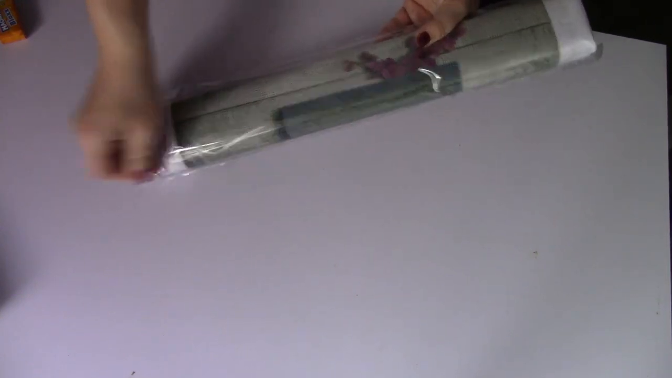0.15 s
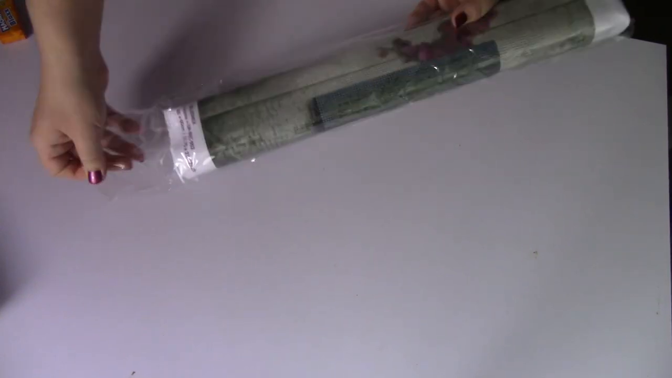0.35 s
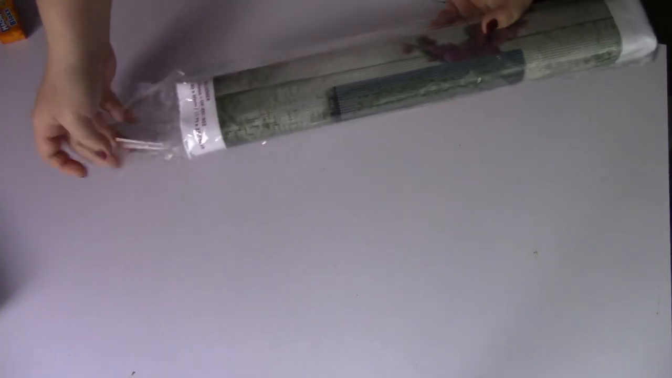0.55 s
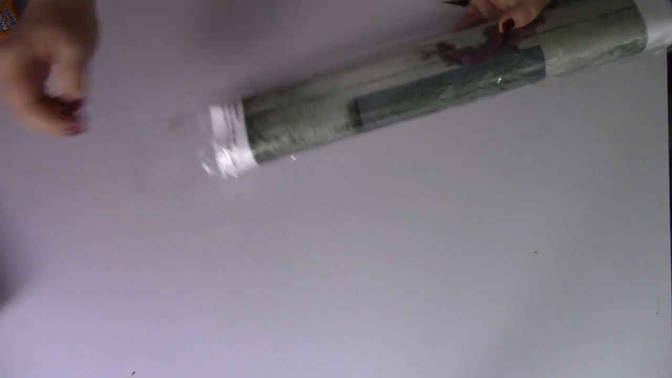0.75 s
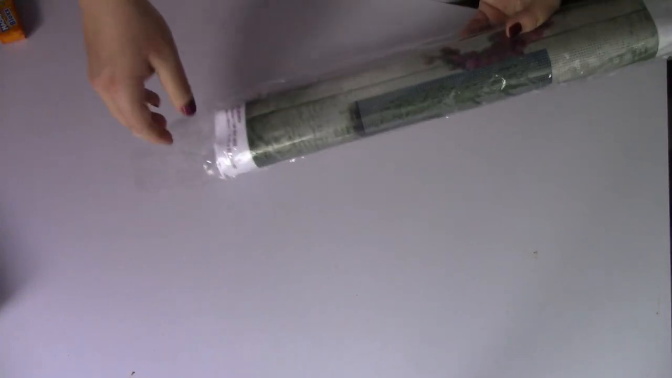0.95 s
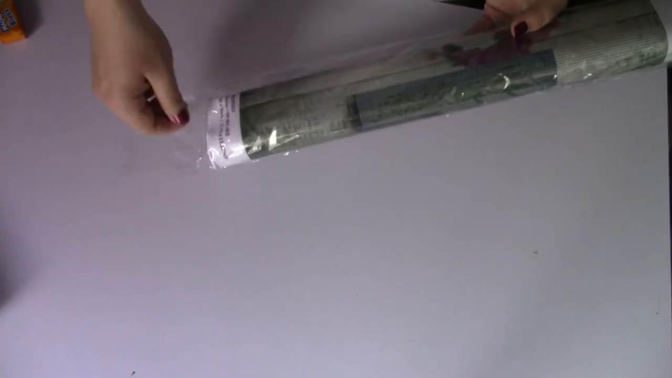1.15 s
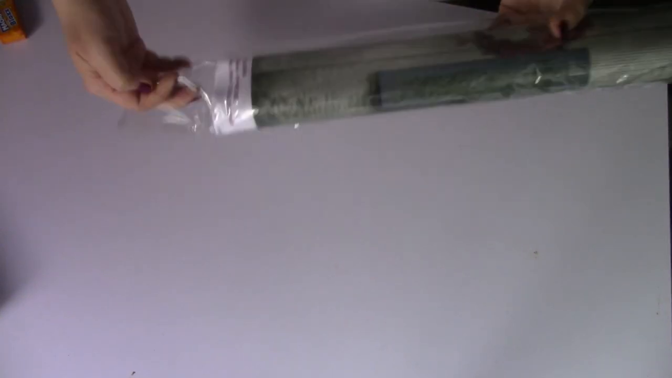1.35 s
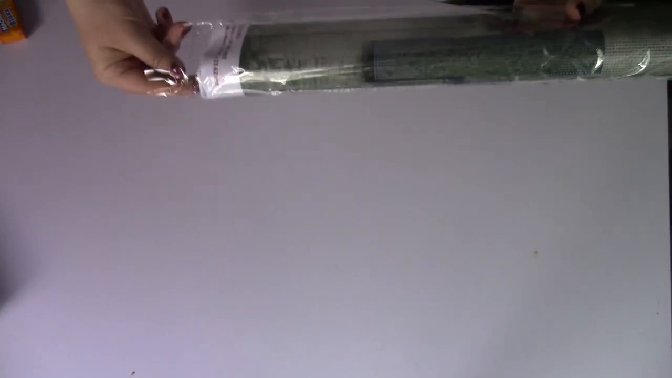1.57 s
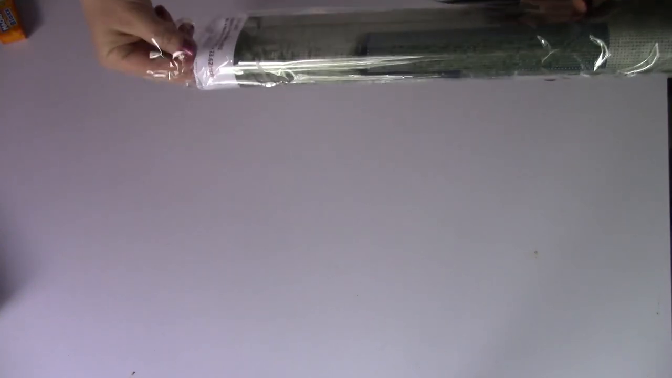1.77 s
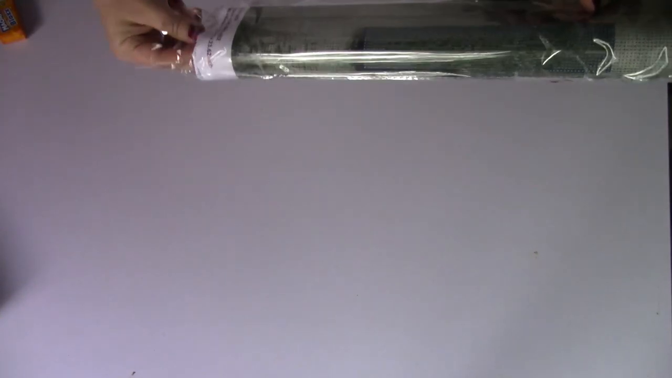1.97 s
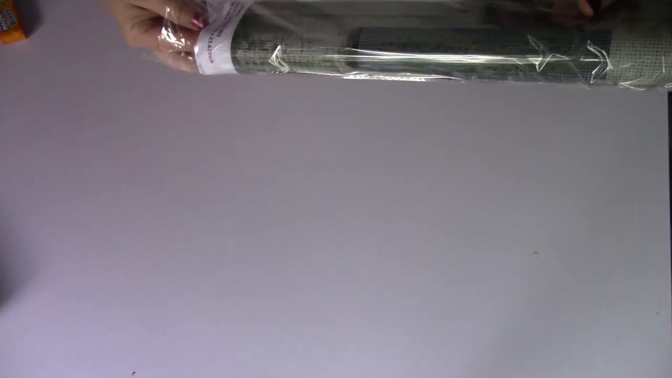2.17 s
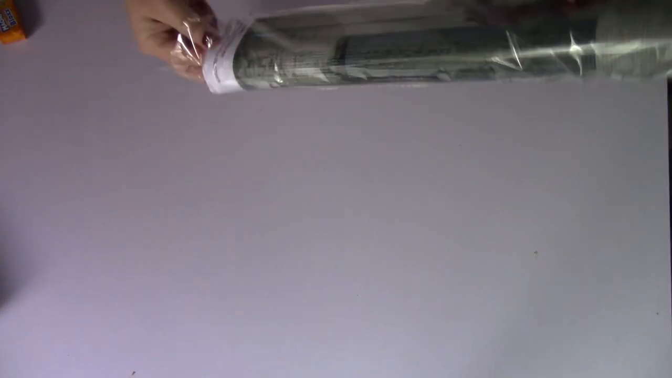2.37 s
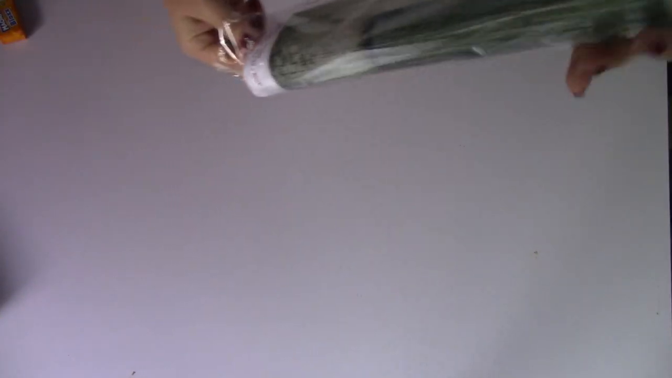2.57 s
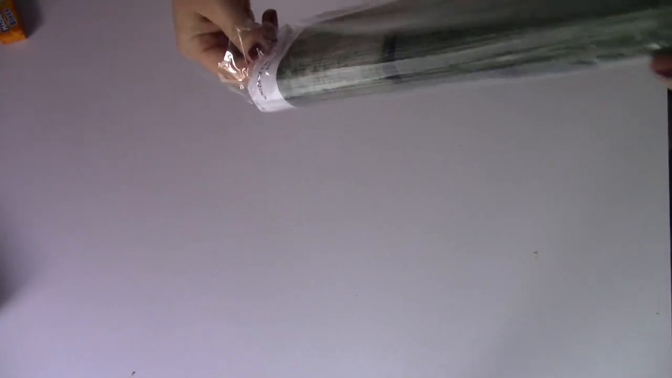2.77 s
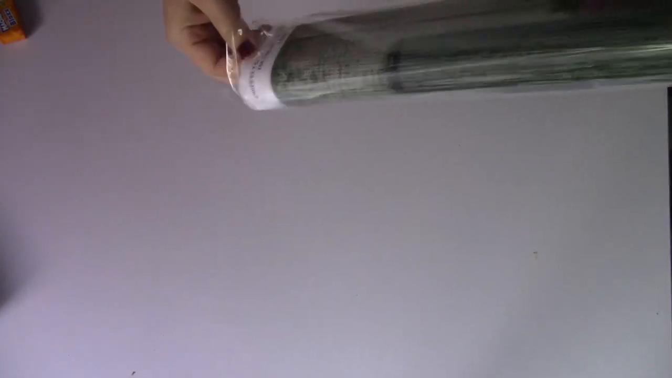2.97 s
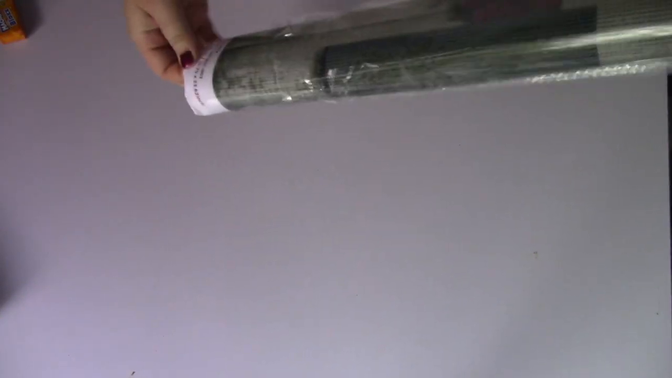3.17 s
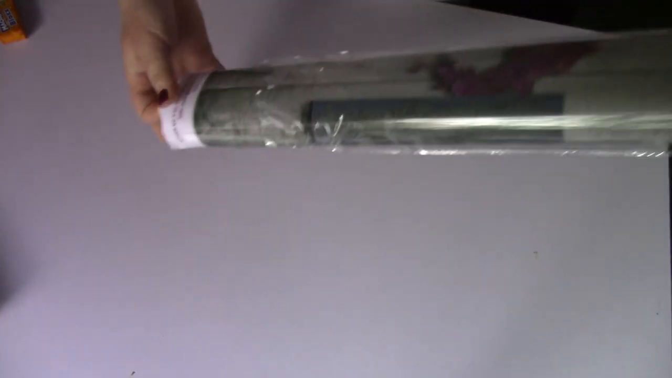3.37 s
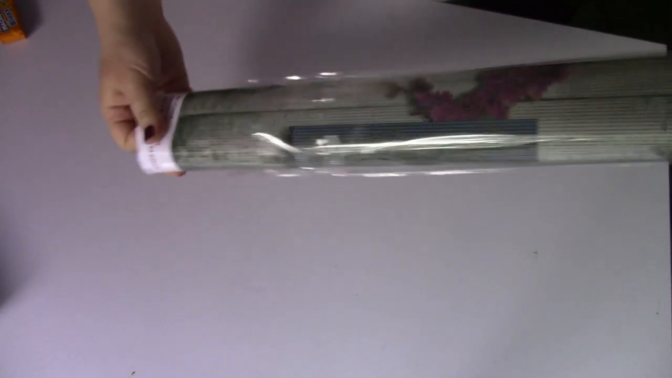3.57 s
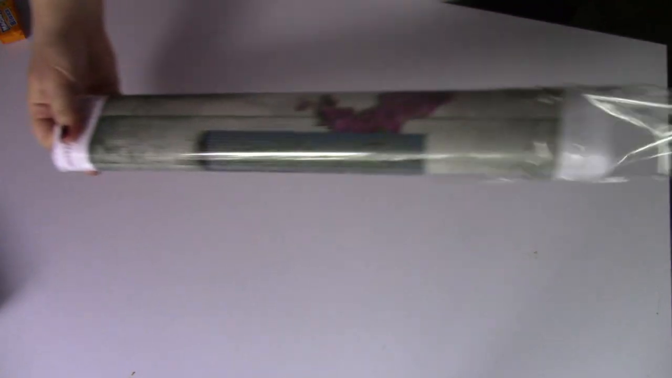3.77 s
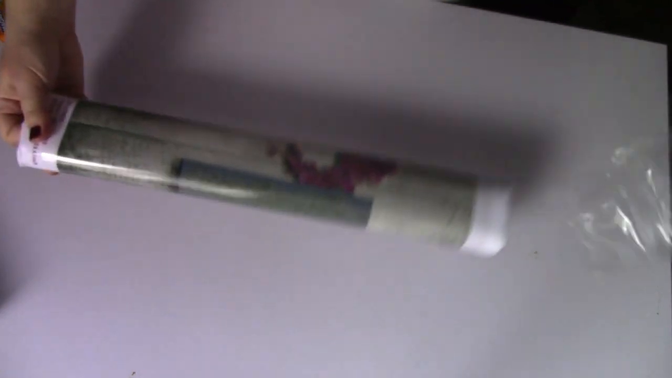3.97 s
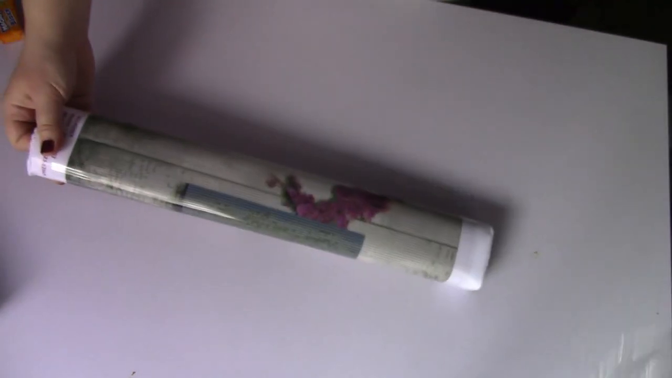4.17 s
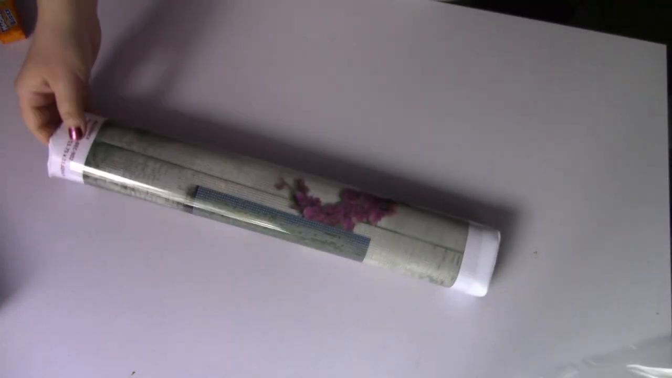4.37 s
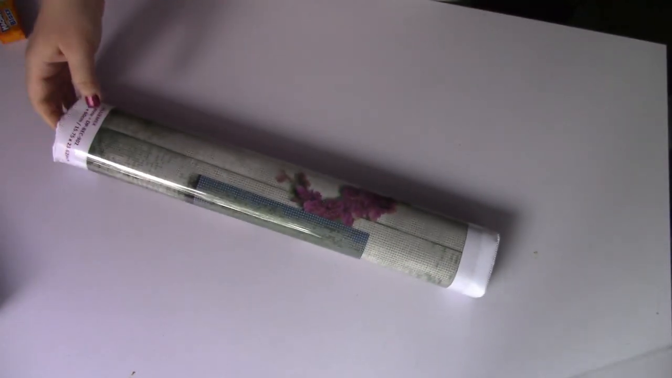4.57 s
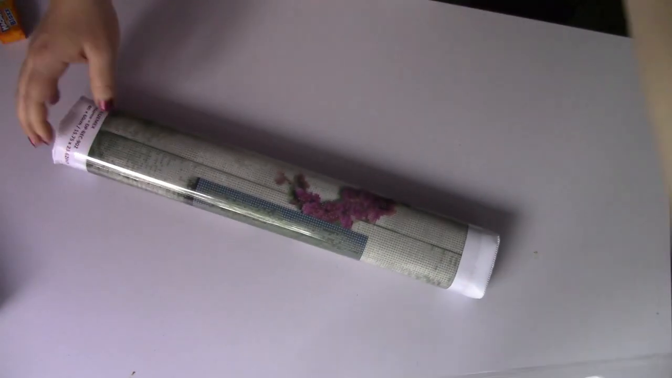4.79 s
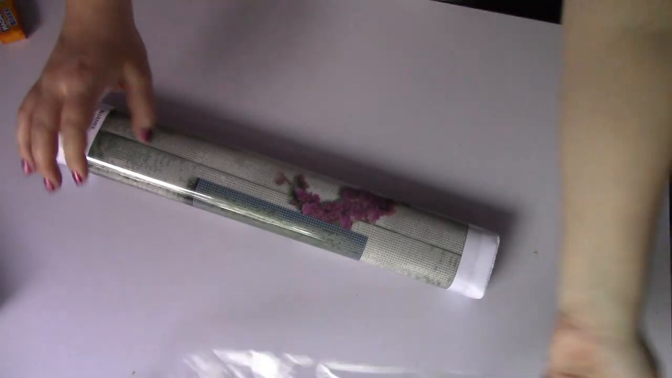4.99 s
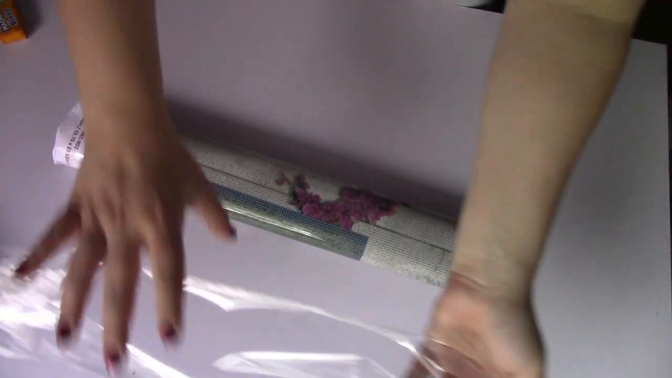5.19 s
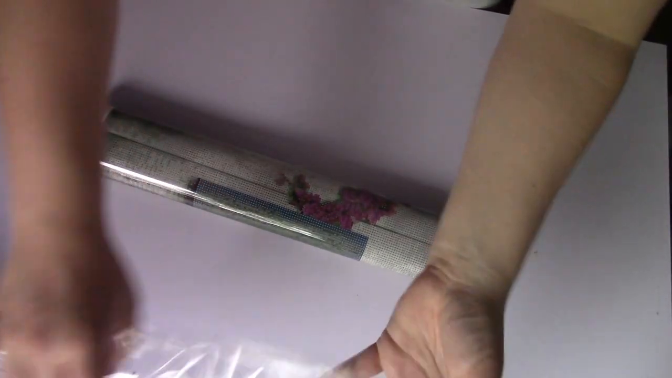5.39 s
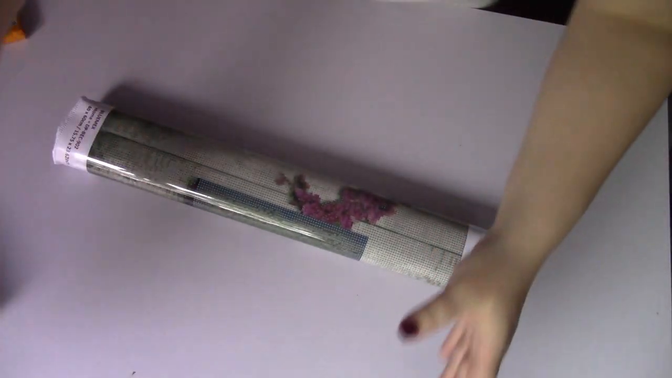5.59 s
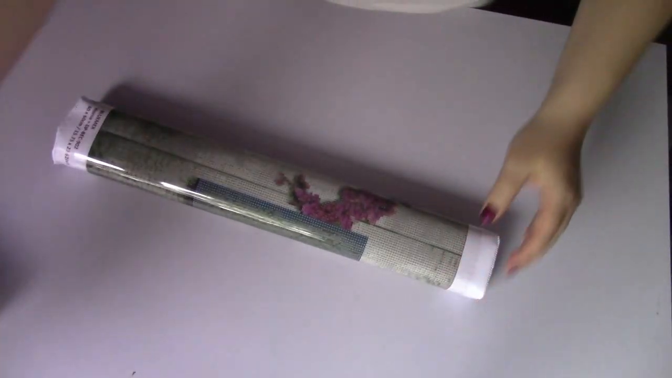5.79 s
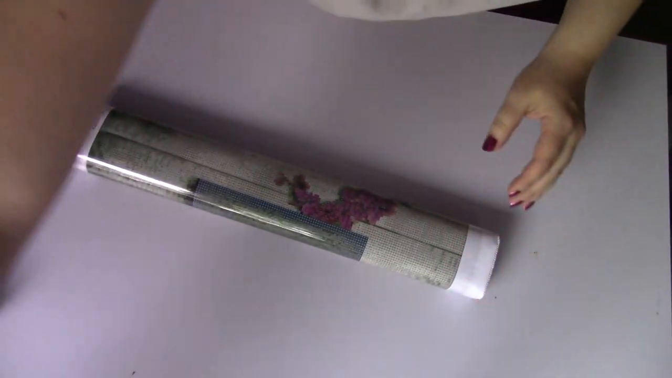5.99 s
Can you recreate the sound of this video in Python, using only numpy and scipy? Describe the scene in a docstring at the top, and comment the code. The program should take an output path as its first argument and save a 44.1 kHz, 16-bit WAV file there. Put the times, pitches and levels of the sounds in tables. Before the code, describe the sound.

Close to the microphone, hands tug a crisp plastic sleeve off a paper roll. Sharp snaps and dense rustling come in uneven bursts, loudest near the start and again around three seconds as the sleeve slides off. The hollow roll knocks lightly, then lands with a soft thud and faint low wobble. Sparse crackles follow, then the film is brushed aside in one more rustling burst. Small quiet room.

```python
"""Thick plastic film crackles close to the microphone: hands peel it as a sleeve off a paper roll, set the roll
down and push the film across a table. Each crease that buckles gives a snap, a noise burst of milliseconds coloured
by its facet; swarms of small snaps over sliding hiss make the rustle, and the sheet flaps in soft pops below them.
The hollow roll knocks in short damped tones, hums as it meets the table and once sets the table top wobbling.
Filtered noise makes the strokes of the sheet, the film drags in tiny jerks, and a small quiet room answers."""
import sys
import numpy as np
from scipy import signal
from scipy.fft import rfft, irfft, next_fast_len
from scipy.io import wavfile
from scipy.ndimage import uniform_filter1d

SR = 44100
rng = np.random.default_rng(int(sys.argv[2]) if len(sys.argv) > 2 else 0)


def log_audio(samples):
    """Write samples as a 16-bit WAV file to the path given in sys.argv[1]."""
    # one column per channel
    frames = np.atleast_2d(samples).T
    # limit to full scale, then quantise
    limited = np.clip(frames, -1, 1)
    pcm = np.round(limited * 32767).astype(np.int16)
    wavfile.write(sys.argv[1], SR, pcm)


N = 266253

# The large creases that stand out of the rustle, close to the microphone.
# Each row: start in seconds, relative level in dB, pitch of the facet in Hz.
LARGE_CREASES = [(0.022, -18, 3320), (0.0564, -18, 5840), (0.1372, -26, 8800), (0.1429, -25, 8100),
                 (0.152, -22, 7150), (0.1955, -20, 2400), (0.21, -9, 2660), (0.256, -9.5, 8300),
                 (0.273, -7.5, 8600.0), (0.308, -10, 3920), (0.3935, -18.5, 7900.0), (0.4526, -17.5, 5300),
                 (0.5105, -18.5, 4550), (0.5924, -21.5, 4270), (0.6254, -19.5, 2280),
                 (0.6426, -16.5, 6700.0), (0.6908, -20, 2100), (0.7345, -32, 2800), (0.8325, -45, 4550),
                 (0.856, -43, 5500), (0.9085, -33, 3600), (0.922, -41, 3800), (1.0954, -19.5, 4630),
                 (1.1035, -21.5, 5372), (1.157, -24, 8400.0), (1.2073, -17, 4900.0), (1.228, -25, 8900),
                 (1.257, -23, 8270), (1.3428, -16.5, 5900),  (1.4202, -16.5, 9800.0),
                 (1.457, -14.5, 2600.0), (1.586, -17.5, 2500.0), (1.6203, -14, 2580),
                 (1.6407, -19, 11500.0), (1.7191, -16, 5710), (1.7617, -21.5, 7650), (1.7723, -24, 10000),
                 (1.803, -24.5, 2700.0), (1.8168, -25, 5130), (1.851, -21, 12100), (1.876, -26, 12000),
                 (1.943, -24.5, 3250), (1.962, -24, 4300), (1.9698, -23, 8440), (1.9844, -21.5, 8440),
                 (2.024, -20, 5000), (2.0440, -20, 3500), (2.0585, -27, 7900), (2.0781, -22, 12200),
                 (2.0988, -30, 3250), (2.125, -34, 8600), (2.141, -26.5, 3500), (2.1605, -20.5, 9150),
                 (2.169, -23, 8950), (2.1853, -31, 8270), (2.1932, -32, 5170), (2.2227, -25, 9470),
                 (2.2283, -23.5, 3300), (2.2451, -22, 9200), (2.2589, -26, 8950), (2.275, -16, 3720),
                 (2.2925, -27, 3700), (2.326, -22, 3440), (2.3472, -22, 5500), (2.352, -22, 3580),
                 (2.3804, -14, 9100), (2.3989, -14.5, 8450), (2.405, -19, 8800), (2.433, -16.5, 2500.0),
                 (2.47, -18, 8060), (2.5039, -19, 7384), (2.5292, -15.5, 9130), (2.5448, -17.5, 12400),
                 (2.6106, -19, 7900), (2.624, -15, 7000), (2.7043, -20, 9200), (2.7240, -13.5, 9000),
                 (2.762, -20, 5900.0), (2.796, -24, 5080), (2.8016, -18, 6170), (2.8152, -22.5, 2930),
                 (2.836, -20.5, 9500.0), (2.859, -15.5, 5400), (2.8736, -21, 2730), (2.8959, -23, 8270),
                 (2.9488, -11, 11930), (2.968, -12, 10100), (3.257, -15, 5360), (3.344, -24.5, 6860),
                 (3.4099, -23, 5693), (3.4613, -33, 4300), (3.518, -25, 2992), (3.6892, -15, 5230),
                 (3.919, -12.5, 5430), (4.0251, -18, 11980), (4.0955, -20.5, 1900), (4.1477, -26, 1470),
                 (4.213, -21, 4440), (4.2823, -19.5, 4540), (4.3633, -24, 6880), (4.3914, -27, 3960),
                 (4.5087, -35, 2950), (4.5662, -26, 1486), (4.6394, -41, 3620), (4.6852, -35.5, 1620),
                 (4.764, -45, 1710), (4.915, -25.5, 5400), (4.9337, -24.5, 8350), (5.177, -34, 7450),
                 (5.201, -28, 6700.0), (5.216, -31.5, 2900), (5.3233, -23, 3660), (5.3822, -20.5, 12000),
                 (5.4058, -17, 9820), (5.421, -13, 4530), (5.4716, -15, 7100), (5.5016, -13, 7280),
                 (5.55, -18, 1940), (5.6295, -22.5, 4440), (5.641, -17.5, 3460), (5.7048, -16.5, 6310),
                 (5.7932, -25.5, 3730), (5.815, -28.5, 2720), (5.852, -36, 4650), (5.906, -32.5, 5150),
                 (5.9765, -27, 10500), (6.0225, -24, 4120)]


def creases(ring_db):
    """The large creases buckle one by one, each as a single snap."""
    start_s, level_db, pitch_hz = np.transpose(LARGE_CREASES)
    heard = snaps(start_s, level_db, pitch_hz, life_s=0.0017, crack_s=0.0011, ring_db=ring_db, tilt_db=2.0)
    return amp(0.99) * heard


def crinkle(level_db, scatter_db, pitch_spread, rub_db, buckle_db):
    """Small creases of widely scattered size over the duller hiss of sliding film."""
    times = swarm(level_db, crowding=0.75, count=2800)
    size, colour = rng.standard_normal((len(times), 2)).T
    pitch = np.clip(typical_pitch(times) * np.exp(pitch_spread * colour), 1500, 14000)
    grains = snaps(times, scatter_db * np.minimum(size, 2), pitch, life_s=0.0016)
    hiss = filtered(rng.standard_normal(N), lambda hz: amp(along(FILM_COLOUR, hz)))
    rub = unit(dulled(hiss, corner_hz=4560))
    # under a light touch the film only slides; it buckles once the force passes a soft threshold
    buckling = 1 / (1 + amp(2 * (buckle_db - level_db)))
    sliding = 1 - buckling + amp(2 * rub_db)
    rustle = np.sqrt(buckling) * steady(grains, span_s=0.058) + np.sqrt(sliding) * rub
    return amp(level_db - 2.0) * rustle


# How the film under the hands tightens and slackens: taut film buckles in smaller, higher facets.
# Each row: time in seconds, typical pitch of the crinkle in Hz.
TAUTNESS = [(0, 5400), (.7, 4500), (1.15, 5200), (1.5, 3850), (1.85, 6550), (2.7, 6950), (3.1, 8200),
            (4.6, 3400), (5.7, 4300)]


def typical_pitch(times):
    """The facet pitch in Hz that the film's tautness favours at each moment."""
    return np.interp(times, *np.transpose(TAUTNESS))


# The colour of the film's snaps and its sliding hiss.
# Each row: frequency in Hz, relative level in dB per Hz.
FILM_COLOUR = [(100, -24.5), (300, -4.5), (600, -5.5), (1300, -4.5), (1900, -0.5), (2600, 0.3), (4000, 2),
               (6200, -1.5), (8800, 0.5), (11500, -3), (15500, -7.5), (18000, -43.5)]


def snaps(times, level_db, pitch_hz, life_s, crack_s=0.0065, split_hz=8000,
          ring_db=7, ring_width=0.15, tilt_db=0.5, size=256):
    """Buckling facets: brief noise bursts, coloured by the film and by each facet's own resonance."""
    t = (np.arange(size) - size // 8) / SR
    hz = np.maximum(np.fft.rfftfreq(size, 1 / SR), 1)
    stretch = np.exp(0.5 * rng.standard_normal((len(times), 1)))  # some facets rattle longer
    noise = rng.standard_normal((len(times), size)) * (t >= 0)

    def burst(fade_s):
        envelope = np.exp(-(t / (fade_s * stretch)) ** 2)
        return rfft(noise * envelope / np.sqrt(fade_s))

    # the treble fades over crack_s, the rest over life_s
    treble = 1 / (1 + (split_hz / hz) ** 2)
    spectrum = treble * burst(crack_s) + (1 - treble) * burst(life_s)
    pitch = pitch_hz[:, None]
    resonance = ring_db * np.exp(-0.5 * (np.log2(hz / pitch) / ring_width) ** 2)  # width in octaves
    # small facets in taut film are bright, wide ones in slack film dull
    taut = typical_pitch(times)[:, None]
    brightness = np.log2(np.sqrt(pitch * taut) / 5200)
    tilt = tilt_db * brightness * np.log2(np.maximum(hz / 1500, 1))
    rattle = irfft(spectrum * amp(along(FILM_COLOUR, hz) + resonance + tilt), size)
    # equal energy for all: that of one millisecond at rms 1
    rattle /= np.sqrt(np.sum(rattle ** 2, axis=1, keepdims=True) / (SR / 1000))
    return placed(times + t[0], rattle * amp(level_db)[:, None])


def swarm(level_db, crowding, count):
    """Random moments that crowd together where the film is worked harder."""
    total = np.cumsum(amp(crowding * level_db))
    return np.searchsorted(total, rng.random(count) * total[-1]) / SR


def steady(x, span_s):
    """Bring a stream of grains close to rms 1 over every short span."""
    size = max(int(span_s * SR), 8)
    power = uniform_filter1d(uniform_filter1d(x * x, size), size)
    floor = 1e-4 * np.mean(x * x)  # keeps gaps from being blown up
    return x / np.sqrt(np.abs(power) + floor)


# Each tug, pull or push of the hands on the film.
# Each row: start in seconds, rise in seconds, hold in seconds, relative level in dB,
# relaxing in dB per second, flapping against crinkle in dB.
HAND_TUGS = [(0.0, 0.003, 0.003, -26.5, 135.0, -12.0), (0.079, 0.013, 0.038, -34.0, 250.0, -20.0),
             (0.178, 0.008, 0.022, -35, 198, -6), (0.206, 0.0038, 0.0094, -20, 110, -14),
             (0.24, 0.03, 0.025, -19.5, 68, -11), (0.585, 0.027, 0.075, -34.5, 216, -9.0),
             (0.751, 0.03, 0.144, -57.5, 175, -5), (1.044, 0.06, 0.017, -32.5, 160.0, -12.0),
             (1.192, 0.018, 0.026, -26.0, 170.0, -10.0), (1.286, 0.012, 0.078, -26, 264.5, -14.0),
             (1.407, 0.024, 0.018, -29, 42.0, -13.0), (1.68, 0.035, 0.018, -34.5, 115.5, -11.0),
             (1.824, 0.029, 0.019, -37, 281.5, -15.0), (1.94, 0.024, 0.008, -41, 55, -9),
             (2.153, 0.007, 0.01, -41, 70.0, -4), (2.308, 0.085, 0.041, -32, 40, -21.0),
             (2.604, 0.027, 0.033, -27.5, 55, -24), (2.878, 0.169, 0.057, -17.5, 90.0, -18),
             (3.242, 0.014, 0.016, -26.5, 160.0, -22.0), (3.403, 0.005, 0.005, -40.5, 45, -10.0),
             (3.516, 0.041, 0.171, -27.5, 65, -14.0), (3.717, 0.085, 0.083, -22.0, 70, -18.0),
             (4.09, 0.012, 0.02, -37, 129.5, 0.5), (4.253, 0.023, 0.031, -31.0, 120.0, -21.0),
             (4.375, 0.018, 0.059, -38.5, 140.0, -8.0), (4.569, 0.041, 0.079, -54, 100, -5.0),
             (4.909, 0.018, 0.013, -37.5, 205.0, -13.0), (4.998, 0.015, 0.098, -57.0, 44.5, -16),
             (5.168, 0.04, 0.008, -46, 150.0, -8.0), (5.305, 0.085, 0.14, -29.5, 190.0, -26.0),
             (5.626, 0.0079, 0.055, -27, 165, -20), (5.86, 0.11, 0.06, -49, 101.5, -16)]


def effort():
    """Levels of crinkle and flapping in dB: the force of each tug builds up, holds and relaxes."""
    t = np.arange(N) / SR
    fine, flap = np.full((2, N), 1e-9)  # powers, with a floor for the logarithm
    for start_s, rise_s, hold_s, level_db, relax, flap_db in HAND_TUGS:
        relaxing_s = np.maximum(t - start_s - rise_s - hold_s, 0)
        force = np.clip((t - start_s) / rise_s, 0, 1) * amp(level_db - relax * relaxing_s)
        fine = fine + force ** 2
        flap = flap + (force * amp(flap_db)) ** 2
    return 10 * np.log10(fine), 10 * np.log10(flap)


# The colour of the sheet's wide panels as they push the air.
# Each row: frequency in Hz, relative level in dB.
SHEET_COLOUR = [(25, -17), (80, -20), (122, -3), (170, -12.5), (260, 0), (480, 3.5), (800, 1.5), (1500, -4),
                (3000, -15), (8000, -64)]


def flapping(level_db, scatter_db):
    """Wide panels of the sheet flip over and push the air in soft, overlapping pops."""
    times = swarm(level_db, crowding=0.15, count=5000)
    size, push = rng.standard_normal((len(times), 2)).T
    flips = placed(times, (np.sign(push) * amp(scatter_db * size))[:, None])
    pops = filtered(flips, lambda hz: amp(along(SHEET_COLOUR, hz)))
    return amp(level_db + 0.8) * steady(pops, span_s=0.12)


# The roll bumped by fingers or against the table.
# Each row: start in seconds, relative level in dB, pitch of the contact in Hz.
ROLL_KNOCKS = [(0.02, -29.5, 421), (1.54, -29.5, 760), (1.621, -26, 496), (1.669, -30, 746),
               (1.797, -28.5, 710), (1.961, -37, 716), (1.986, -35, 600), (2.118, -36.5, 500),
               (2.160, -31.5, 600), (3.322, -29, 181), (3.324, -32, 574), (3.517, -27, 504),
               (4.093, -24.5, 277), (4.095, -29, 1210), (4.1, -23, 530), (4.434, -28.5, 610),
               (4.566, -37, 410), (4.567, -35, 1440), (5.677, -28.5, 304)]


def knocks(t60, scuff_db, scuff_t60):
    """The paper roll is well damped: a few cycles at the contact's pitch and a short scuff around it."""
    t = np.arange(SR // 8) / SR
    blows = []
    for _, level_db, hz in ROLL_KNOCKS:
        onset = 1 - np.exp(-t / 0.00078)
        push = np.sin(2 * np.pi * hz * t) * amp(-60 * t / t60) * onset
        band = signal.butter(2, [hz / 2, hz * 1.6], "bandpass", fs=SR, output="sos")
        scrape = unit(signal.sosfilt(band, rng.standard_normal(len(t))))
        scuff = scrape * amp(scuff_db - 60 * t / scuff_t60)
        blows.append(amp(level_db + 7.0) * (push + scuff))
    return placed([row[0] for row in ROLL_KNOCKS], np.array(blows))


# The air in the hollow roll. Each row: frequency in Hz, level in dB, t60 in seconds.
TUBE_MODES = [(123, -36.5, 0.29), (260, -38.5, 0.21)]
# The table under the landing roll. Each row: frequency in Hz, level in dB, t60 in seconds.
TABLE_MODES = [(32.4, -23, 0.56)]
# The roll meets the table with one end, then lands flat. Each entry: start in seconds.
LANDINGS_S = [3.323, 4.098]


def table():
    """The tube hums each time it meets the table; the flat landing also sets the table top wobbling."""
    hum = sum(ringing(TUBE_MODES, start_s) for start_s in LANDINGS_S)
    wobble = ringing(TABLE_MODES, LANDINGS_S[-1])
    return hum + wobble


def ringing(modes, start_s):
    """Modes set going by one blow, each a sine that dies away at its own rate."""
    t = np.maximum(np.arange(N) / SR - start_s, 0)
    return sum(amp(db - 60 * t / t60) * np.sin(2 * np.pi * hz * t) for hz, db, t60 in modes)


# The film dragging along the hollow roll.
# Each row: middle in seconds, level in dB, half length in seconds, resonance in Hz.
FILM_DRAGS = [(1.321, -35, 0.032, 545), (1.443, -34.5, 0.14, 2580), (1.9, -54, 0.95, 604),
              (3.107, -59.5, 0.66, 119), (3.647, -43, 0.12, 477), (3.706, -35, 0.018, 470),
              (4.465, -50, 0.018, 750)]


def drags(width=0.3, scatter_db=5, count=5000):
    """Film catches and slips on the roll: tiny jerks ring table, hollow tube or, higher up, tight sleeve."""
    out = np.zeros(N)
    for middle_s, level_db, half_s, centre in FILM_DRAGS:
        size, push = rng.standard_normal((count, 2)).T
        jerks = (np.sign(push) * amp(scatter_db * size))[:, None]
        slips = placed(rng.random(count) * N / SR, jerks)

        def resonance(hz):
            damping = 1j * hz * width * centre
            return (damping / (centre ** 2 - hz ** 2 + damping)) ** 2

        out += swells([(middle_s, level_db, half_s)]) * unit(filtered(slips, resonance))
    return out


# The loose sheet sweeping over the table.
# Each row: middle in seconds, level in dB, half length in seconds.
SHEET_SWEEPS = [(0.302, -40.5, 0.14), (3.15, -46.5, 0.053), (3.8, -48, 0.25), (5.43, -48, 0.13),
                (5.685, -41.5, 0.05), (5.78, -53, 0.069)]
# The colour of the air it moves. Each row: frequency in Hz, relative level in dB.
DRAUGHT_COLOUR = [(30, 6), (50, -3.5), (90, -4), (180, 0.5), (270, 5.5), (480, -24), (2000, -63)]


def sweeps():
    """The whole sheet fans the air and brushes the table top: coloured noise that swells with each stroke."""
    draught = filtered(rng.standard_normal(N), lambda hz: amp(along(DRAUGHT_COLOUR, hz)))
    return swells(SHEET_SWEEPS) * unit(draught)


def swells(rows):
    """Strokes that speed up and slow down again, as bell-shaped gains."""
    t = np.arange(N) / SR
    return sum(amp(db) * np.exp(-((t - middle_s) / half_s) ** 2) for middle_s, db, half_s in rows)


# The small room around the table. Each row: frequency in Hz, t60 in seconds.
ROOM_DECAY = [(150, 0.91), (600, 0.34), (3500, 0.18), (9000, 0.25), (16000, 0.094)]


def room(x, size=128):
    """Every sound starts from a new spot, so the room's answer is a diffuse wash dying away band by band."""
    frames = dict(fs=SR, nperseg=size, noverlap=size - size // 4)
    hz, t, z = signal.stft(x, **frames)
    lag = t[t < 0.4]
    arrived = lag > 0.003
    late = arrived * amp(-120 * lag / along(ROOM_DECAY, hz)[:, None])  # a power, so -60 dB at t60
    decay = late * (1 + 17.4 * np.exp(-lag / 0.0033))  # the table and near walls answer first
    decay /= decay.sum(axis=1, keepdims=True)
    power = np.abs(signal.fftconvolve(np.abs(z) ** 2, decay, axes=1)[:, :len(t)])
    wash = signal.stft(rng.standard_normal(N), **frames)[2]
    shaped = wash * np.sqrt(power / np.mean(np.abs(wash) ** 2))
    wet = signal.istft(shaped, **frames)[1][:N]
    return dulled(wet, corner_hz=10600)


# The colour of the quiet room. Each row: frequency in Hz, relative level in dB.
HUSH_COLOUR = [(32, -2.5), (50, -6), (90, -18), (250, -10.5), (700, -30.5), (2000, -26.5), (8000, -69),
               (16000, -47.5)]


def hush():
    """The quiet room's own rumble and hiss, as steady coloured noise."""
    noise = filtered(rng.standard_normal(N), lambda hz: amp(along(HUSH_COLOUR, hz)))
    return amp(-58.5) * unit(noise)


def amp(db):
    """Decibels to gain."""
    return 10 ** (np.asarray(db) / 20)


def unit(x):
    """Scale to rms 1."""
    return x / np.sqrt(np.mean(x ** 2) + 1e-20)


def along(points, hz):
    """(Hz, value) points read on a log frequency axis."""
    f, v = np.transpose(points)
    return np.interp(np.log(hz + 1), np.log(f), v)


def filtered(x, response):
    """x times a response of frequency, padded so that its tail does not wrap round."""
    m = next_fast_len(N + SR // 2)
    return irfft(rfft(x, m) * response(np.fft.rfftfreq(m, 1 / SR)), m)[:N]


def dulled(x, corner_hz):
    """A gentle, first-order loss of treble."""
    return filtered(x, lambda hz: 1 / (1 + 1j * hz / corner_hz))


def placed(times, sounds):
    """Sum rows of short sounds, each starting at its time."""
    starts = np.round(np.asarray(times) * SR).astype(int)
    at = starts[:, None] + np.arange(sounds.shape[1])
    return np.bincount(np.clip(at, 0, N).ravel(), sounds.ravel(), N + 1)[:N]


def scene():
    """Film and roll, direct and through the room."""
    crinkle_db, flap_db = effort()
    loud = creases(ring_db=7)
    all_round = creases(ring_db=5.0)  # a facet's colour differs with direction; the room hears it evened out
    fine = crinkle(crinkle_db, scatter_db=6.5, pitch_spread=0.52, rub_db=-11.5, buckle_db=-54.5)
    bumps = knocks(t60=0.025, scuff_db=-12, scuff_t60=0.05)
    wet = room(amp(-4) * all_round + amp(-4.5) * fine + amp(-9.0) * bumps)
    low = flapping(flap_db, scatter_db=6.5) + sweeps() + drags() + table()
    return (loud + fine + bumps + wet + low + hush())[None]


def record(dry, ceiling=0.66, top_hz=16000):
    """The recorder rounds off the highest peaks and keeps nothing above its band limit."""
    rounded = dry[0] / (1 + np.abs(dry[0] / ceiling) ** 4) ** (1 / 4)
    return filtered(rounded, lambda hz: 1 / np.sqrt(1 + (hz / top_hz) ** 260))[None]


dry = scene()
out = record(dry)
log_audio(out)
```